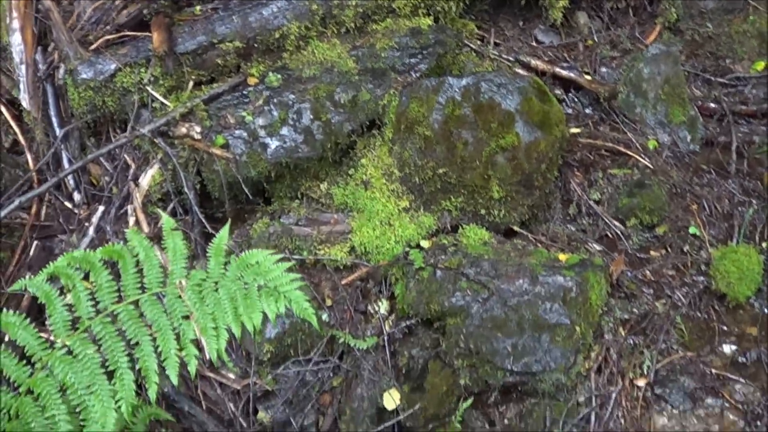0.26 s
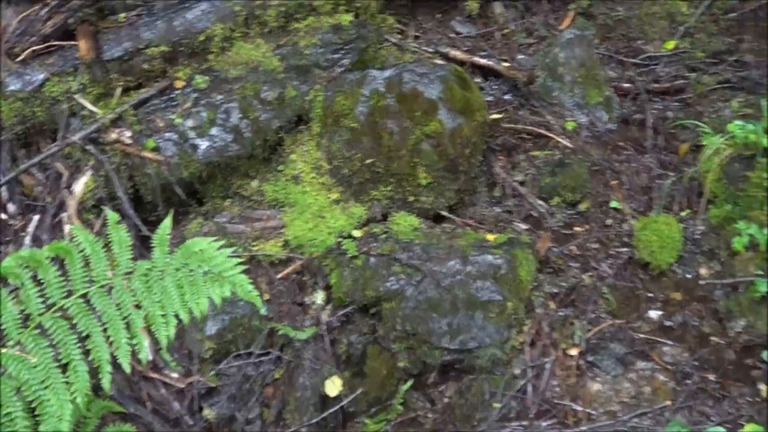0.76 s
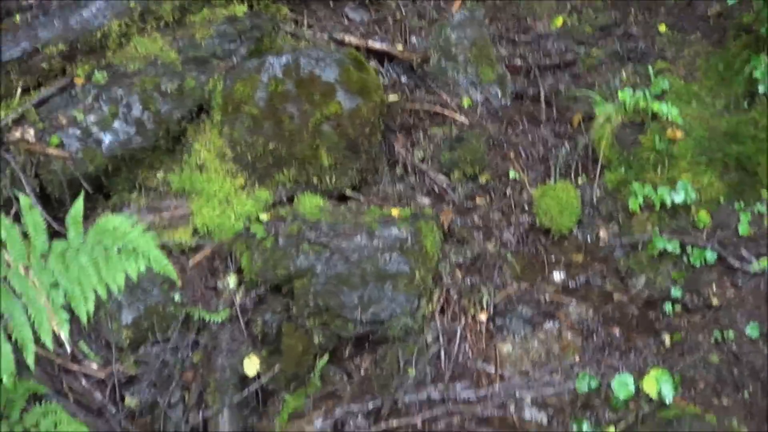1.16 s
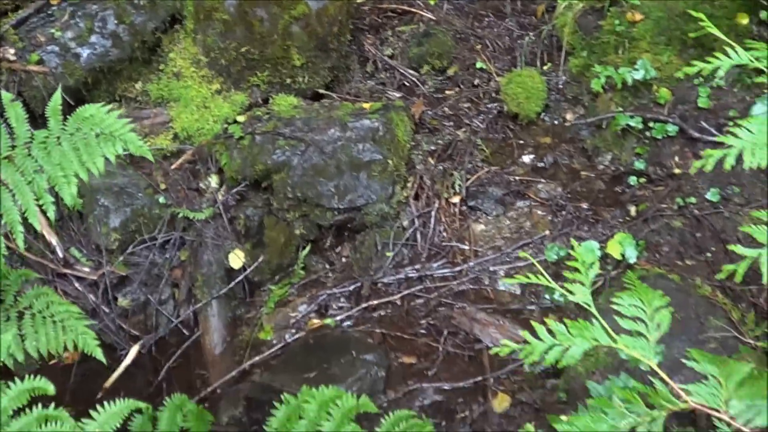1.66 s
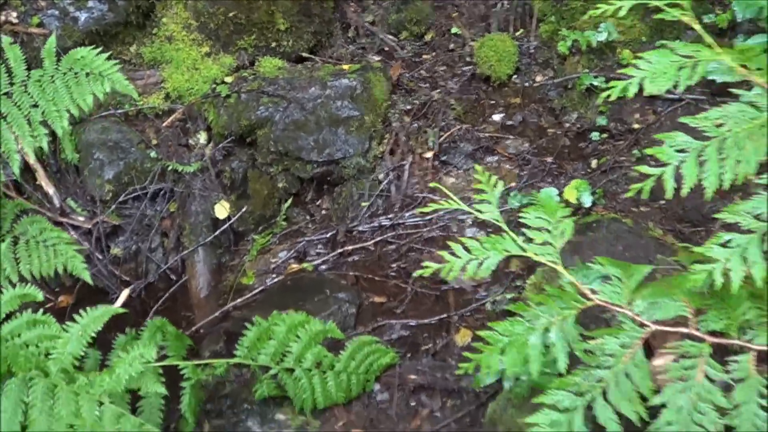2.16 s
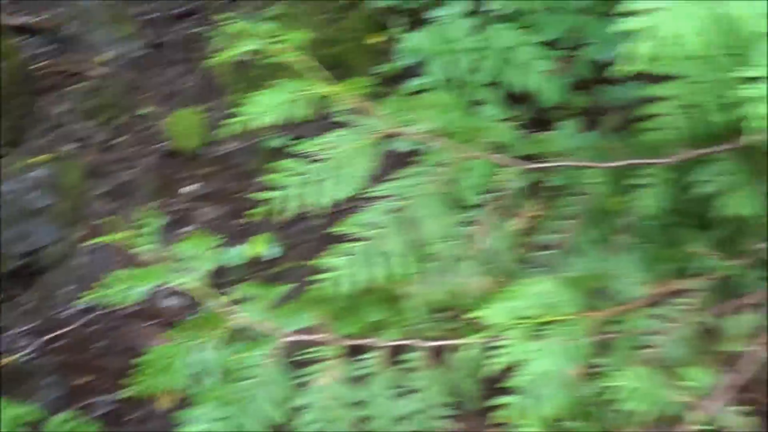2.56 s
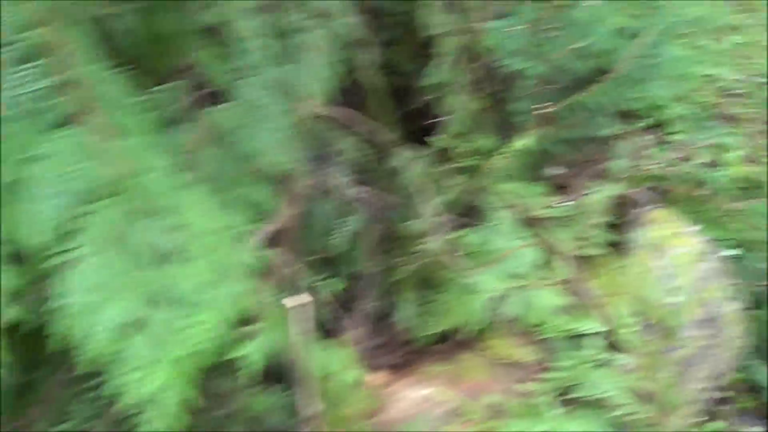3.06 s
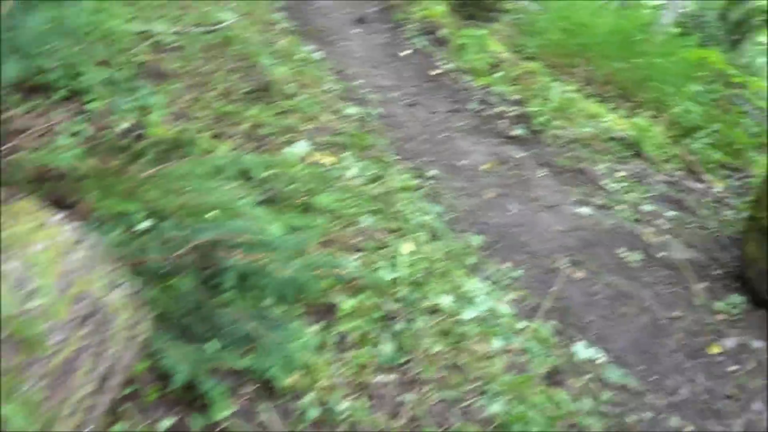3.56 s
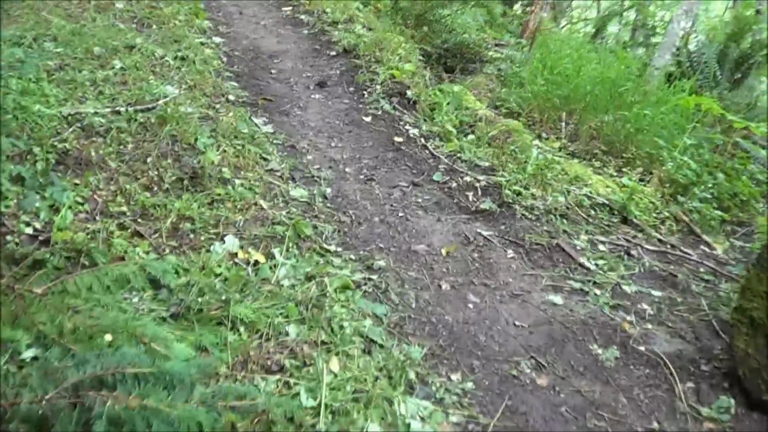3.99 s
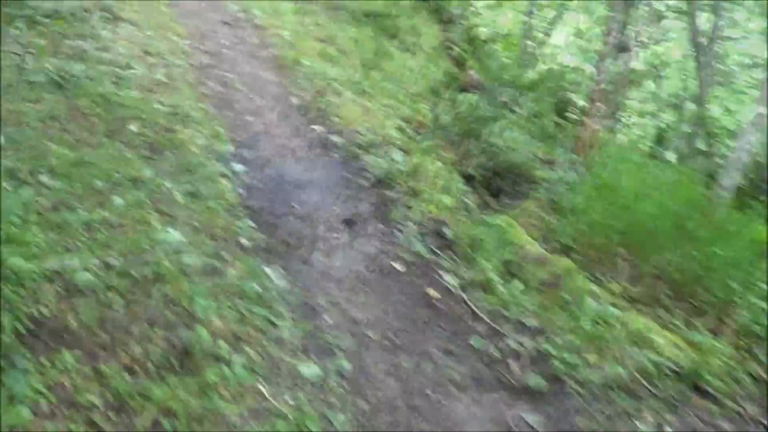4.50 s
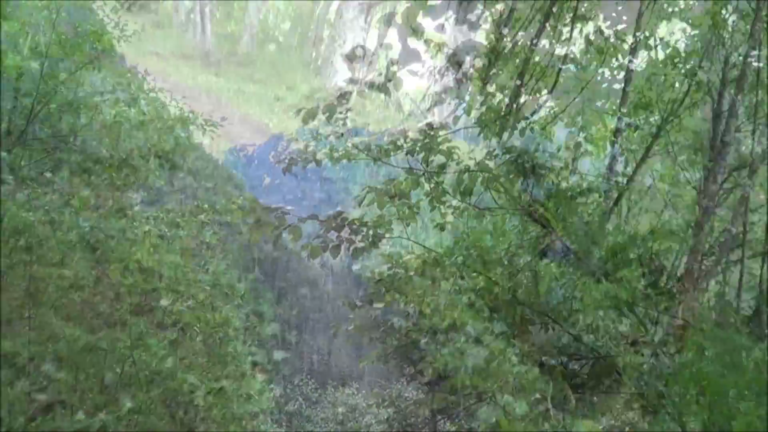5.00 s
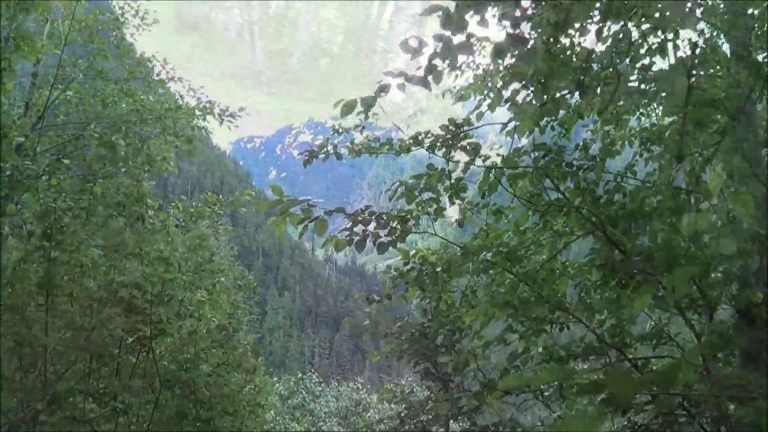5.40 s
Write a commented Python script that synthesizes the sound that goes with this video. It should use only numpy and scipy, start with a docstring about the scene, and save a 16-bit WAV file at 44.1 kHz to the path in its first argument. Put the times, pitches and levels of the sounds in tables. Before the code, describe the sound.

Water falls from a rock overhang in a forest, a steady bright patter with sharp splats and small rising plinks from puddles. Around two and a half seconds the drops are densest. As the camera turns away the patter grows duller and softer, a foot scuffs, hard knocks and a click hit the camera body, and everything fades to a faint rush. Close stereo camera microphone outdoors.

```python
"""Water falling from a rock overhang

Thin streams patter on wet forest stones: showers of filtered noise bursts and ticks in three bands.
Fat drops crack and scatter as noise bursts, as does one scuff of a foot; drops in puddles ring as bubbles
with rising pitch, and a shuffling foot thumps as low rings. The camera turns away, which crossfades the
water's colour; knocks ring its body and its casing clicks.
The patter fades towards the faint rush of the valley, a filtered noise."""
import sys
import numpy as np
from scipy import signal
from scipy.fft import rfft, irfft
from scipy.io import wavfile
from scipy.ndimage import uniform_filter1d

SR = 44100
rng = np.random.default_rng(int(sys.argv[2]) if len(sys.argv) > 2 else 0)


def file_out(sig):
    """Save sig as 16-bit WAV at sys.argv[1]."""
    # one column per channel
    cols = np.atleast_2d(sig).T
    # limit, then scale
    lim = np.clip(cols, -1, 1)
    pcm = np.round(lim * 32767).astype(np.int16)
    wavfile.write(sys.argv[1], SR, pcm)


N = 248720
TIME, HZ = np.arange(N) / SR, np.fft.rfftfreq(N, 1 / SR)

# the falling water as the camera moves, ahead of each layer's trim:
# start_s [s], level_db [dB], treble_tilt_db [dB, treble over middle]
WATER_LEVEL = [(0., -31, 6), (2.5, -28, 5), (3.2, -29.5, 4), (3.9, -30.5, 3), (4.06, -35.5, 3),
               (4.7, -37, 3), (5.09, -45.5, 0), (5.64, -46.5, -4)]
# how far the camera has turned from the water: start_s [s], turned_away_share [0-1]
CAMERA_TURN = [(2.5, 0), (3.3, 0.44), (4.6, 0.66)]


def water():
    """Fine spray, patter on stones and a low trickle share the spectrum; turning away recolours all three."""
    # colour with the camera facing the water: frequency_hz [Hz], density_db [relative dB per Hz]
    facing_colour = [(24, -69), (40, -36.5), (249, -15), (516, -13.5), (790, -8.5), (1410, -9),
                     (1810, -10.5), (2100, -8), (2440, -9), (4680, -7), (5310, -2.5), (6650, 0.5),
                     (9940, 6.5), (14500, -3.5), (16000, -11)]
    # colour with the camera turned away: frequency_hz [Hz], density_db [relative dB per Hz]
    away_colour = [(24, -61), (40, -32), (118, -13), (231, -11), (312, -1.5), (751, -1), (1070, -4.5),
                   (1150, -3), (2380, 5.5), (2980, -2.5), (4030, 6.5), (4680, -5.5), (10400, 5),
                   (14800, -10), (16000, 0.5)]
    trickle_top_hz, patter_top_hz = 1427, 5290
    low, mid = below(trickle_top_hz), below(patter_top_hz)
    spray = shower(per_s=300, spread_db=1.5, scatter_s=0.012, tick_share=0.65, wash_share=0.5)
    patter = shower(per_s=260, spread_db=4.0, scatter_s=0.012, tick_share=0.9, wash_share=0.32)
    trickle = shower(per_s=200, spread_db=0.5, scatter_s=0.012, tick_share=0.48, wash_share=0.9)
    level_db, tilt_db = follow(WATER_LEVEL), follow(WATER_LEVEL, axis=2)
    # as the tilt falls, the spray dulls and the low trickle comes up
    layers = [(spray, 1 - mid, 0.7 + tilt_db),
              (patter, mid - low, 0.7),
              (trickle, low, -0.7 - 1.48 * tilt_db)]
    turned, out = np.clip(follow(CAMERA_TURN), 0, 1), np.zeros((2, N))
    for drops, band_power, trim_db in layers:
        band_gain = np.sqrt(abs(band_power))
        facing = evened(coloured(drops, band_gain * gain_of(read(facing_colour, HZ))))
        away = evened(coloured(drops, band_gain * gain_of(read(away_colour, HZ))))
        out += gain_of(level_db + trim_db) * ((1 - turned) * facing + turned * away)
    return out


def shower(per_s, spread_db, scatter_s, tick_share, wash_share, count=3):
    """Small drops on several stones: decaying droplet bursts, sharp ticks and a steady wash of noise."""
    out, stone_phase = np.zeros((2, N)), np.log2(HZ + 1) * np.pi / 2
    for k in range(count):
        hits = impacts(per_s / count, spread_db)
        # powers add up, so the amplitude of one burst decays with scatter_s
        scatter_power = signal.lfilter([1], [1, -np.exp(-2 / (scatter_s * SR))], hits ** 2)
        bursts = evened(np.sqrt(scatter_power) * rng.standard_normal((2, N)))
        ticks = evened(impacts(per_s * count, spread_db) * rng.choice([-1, 1], (2, N)))
        # each stone favours its own stretches of the spectrum
        stone_gain = np.cos(stone_phase + np.pi * k / count) ** 2
        out += coloured(bursts + tick_share * ticks, stone_gain)
    return evened(out) + wash_share * rng.standard_normal((2, N))


def impacts(per_s, spread_db):
    """Impacts at random times, most of them small and a few large."""
    size = gain_of(spread_db * np.minimum(rng.exponential(1, N), 4))
    return size * (rng.random(N) < per_s / SR)


def splats_and_scuff(size=8192):
    """A crack and a swelling, then dying cloud of noise: a fat drop bursting on stone, or a scuff of a foot."""
    # bursts of noise: fat drops on stone, and at 3.618 s a long scuff of a foot on the ground:
    # start_s [s], level_db [dB], centre_hz [Hz], t60_s [s]
    noise_bursts = [(0.018, -13.5, 9000, 0.12), (0.0664, -15.5, 13500, 0.033), (0.1007, -21, 4200, .03),
                    (0.4487, -18.5, 4400, .12), (0.4852, -17.5, 3000, 0.099), (0.6634, -17, 10800, 0.025),
                    (0.7284, -16, 5800, 0.049), (0.8846, -20, 7400, 0.022), (1.2743, -18, 4620, 0.11),
                    (1.3095, -14.5, 7600, 0.12), (1.5121, -9, 9550, 0.036), (1.8395, -15.5, 7200, 0.15),
                    (1.8612, -15, 10000, .015), (1.8871, -15.5, 6460, 0.21), (2.1816, -15.5, 5830, .06),
                    (2.296, -11, 10200, 0.14), (2.4079, -13, 5200, 0.1), (2.4345, -11, 1600, 0.053),
                    (2.5443, -15.5, 6260, .065), (2.6771, -15.5, 5500, .07), (2.8537, -14.5, 8100, 0.083),
                    (2.9635, -17.5, 2900, 0.085), (2.9858, -12, 8600, 0.061), (3.058, -15, 6250, 0.055),
                    (3.1615, -18.5, 3640, 0.12), (3.312, -15.5, 4000, 0.16), (3.3632, -14, 4940, 0.1),
                    (3.618, -13.5, 6940, 0.3), (4.4635, -23, 10500, 0.0089), (5.1688, -37, 4300, 0.027)]
    # a short burst cracks hard; one that scatters for long starts softly
    soft_t60_s, snap_db, snap_decay_s, slap = 0.076, 7.5, 0.0011, 4.3
    # a long cloud swells slowly and spans a wide band: each a value for a 1 s t60, and a power of t60
    rise_s, rise_power, span_hz, span_power = 0.096, 1.6, 14600, 0.33
    lumps_db = 2
    out, t = np.zeros((2, N)), np.arange(size) / SR
    for s, db, centre_hz, t60 in list(noise_bursts) + strays():
        unevenness = evened(uniform_filter1d(rng.standard_normal(size), size=24))
        lumps = evened(gain_of(lumps_db * unevenness))
        swell = 1 - np.exp(-t / (rise_s * t60 ** rise_power))
        cloud = dying(t, t60) * swell * lumps
        snap = gain_of(snap_db) / (1 + t60 / soft_t60_s)
        envelope = np.hypot(cloud, snap * np.exp(-t / snap_decay_s))
        burst = envelope * rng.choice([-1, 1], (2, size))
        burst[0, 0] += snap * slap  # the first contact is one clean impulse, alike at both ports
        add(out, s, gain_of(db) * struck(burst, centre_hz, span_hz * t60 ** span_power))
    return out


def strays(count=60):
    """Lesser drops, as rows of noise bursts: random times, centres and lengths, their level following the water."""
    per_s, over_water_db, lowest_hz, highest_hz = 7, 0.5, 2460, 12200
    gap, colour, length = rng.random((count, 3)).T
    times = np.cumsum(-np.log(1 - gap)) / per_s
    levels = np.interp(times, TIME, follow(WATER_LEVEL)) + over_water_db
    centres = lowest_hz * (highest_hz / lowest_hz) ** colour
    t60s = 0.012 * (.5 + length)  # 6 to 18 ms
    return [row for row in zip(times, levels, centres, t60s) if row[0] < TIME[-1]]


def struck(burst, centre_hz, span_hz):
    """Colours an impact with one broad hump; minimum phase, so nothing sounds before it."""
    widest_octaves, lowest_hz, top_hz = 2.2, 344, 14300
    hz = np.fft.rfftfreq(burst.shape[-1], 1 / SR)
    octaves = min(span_hz / centre_hz, widest_octaves)
    hump = 1 / (1 + (np.log2((hz + 1) / centre_hz) / octaves) ** 2)
    bass_cut = hz ** 2 / (hz ** 2 + lowest_hz ** 2)
    treble_cut = 1 + (hz / top_hz) ** 8
    colour = evened(hump * bass_cut / treble_cut + 1e-5)
    # the Hilbert transform of the log gain yields the minimum phase
    log_gain = np.log(np.r_[colour, colour[-2:0:-1]])
    causal = np.exp(np.conj(signal.hilbert(log_gain)))[:len(hz)]
    return irfft(rfft(burst) * causal)


def droplets(level_db=-8.5, lowest_hz=1700, highest_hz=4800, per_s=230, spread_db=2.5, cycles=11.0,
             count=24, size=900):
    """Tiny bubbles tinkle within the patter as rising, decaying sines, each pitch in its own place."""
    out, t = np.zeros((2, N)), np.arange(size) / SR
    for hz in np.geomspace(lowest_hz, highest_hz, count):
        chirp = np.exp(-hz * t / cycles) * np.sin(2 * np.pi * hz * t * (1 + 10 * t))
        ring = high_passed(chirp, hz / 2)
        place = np.array([[1], [rng.standard_normal()]])
        out += place * signal.oaconvolve(impacts(per_s / count, spread_db), ring)[:N]
    return gain_of(follow(WATER_LEVEL) + level_db) * evened(out)


def bubbles_and_thumps(ring_s=0.028, rise=0.035, fizz_share=0.2, fizz_t60=0.16, echo_s=(.0042, .012),
                       echo_gain=(.4, .25), left_db=5.0, size=5000):
    """A rising ring, a fizz of noise and two echoes off the rocks: a puddle drop's bubble, or a foot's low thump."""
    # drops into puddles, and, at 320 to 412 Hz, low thumps of a shuffling foot:
    # start_s [s], level_db [dB, ahead of the left-right balance], pitch_hz [Hz, as the ring starts]
    rings = [(0.1487, -17, 2130), (0.433, -20, 2270), (0.964, -14.5, 2280), (1.001, -16.5, 3960),
             (1.111, -11.5, 2570), (1.3067, -16, 2590), (1.446, -12.5, 2570), (1.481, -14.5, 3630),
             (1.585, -24, 2180), (1.9585, -14.5, 2620), (2.1148, -21, 2080), (2.285, -14, 2060),
             (2.4356, -7, 2070), (2.4654, -11, 2750), (2.533, -10.5, 2050), (2.5467, -13, 2240),
             (2.679, -13, 3030), (3.217, -24, 412), (3.22, -17, 2060), (3.5297, -14, 2570),
             (3.595, -23, 358), (3.617, -24, 325), (3.7623, -16.5, 2500), (3.8056, -13, 3900),
             (4.0105, -20, 4000), (4.394, -31, 320), (4.5718, -23.5, 2870), (4.954, -29, 810),
             (5.137, -30, 1900)]
    out, t = np.zeros((2, N)), np.arange(size) / SR
    for s, db, hz in rings:
        age = t / (ring_s * np.sqrt(1000 / hz))  # low pitches ring longer; down 60 dB at age 1
        chirp = np.sin(2 * np.pi * hz * t * (1 + rise * age))
        ring = high_passed(gain_of(db - 60 * age) * chirp, hz / 2)
        band = signal.butter(2, [.75 * hz, 1.35 * hz], "bandpass", fs=SR, output="sos")
        # part of the fizz is common to both ports
        noise = rng.standard_normal(size) + .5 * rng.standard_normal((2, size))
        fizz = evened(signal.sosfilt(band, noise))
        add(out, s, ring + fizz_share * gain_of(db) * dying(t, fizz_t60) * fizz)
        for delay, gain in zip(echo_s, echo_gain):
            for channel in out:
                add(channel, s + delay * rng.uniform(.85, 1.15), gain * ring)
    # all of these lie to the left: the right port hears them softer and two samples later
    left = out[0] * gain_of(left_db / 2)
    right = np.roll(out[1], 2) * gain_of(-left_db / 2)
    return np.array([left, right])


def knocks(lowest_hz=380, lag_s=0.00013, size=4000):
    """Each knock rings the modes of the camera body and reaches the left port first."""
    # knocks on the camera: start_s [s], level_db [dB]
    hits = [(3.9811, -13), (3.9820, -10), (3.9859, -10.5), (3.9902, -25), (4.5409, -17.5), (4.545, -27)]
    # modes of the camera body: pitch_hz [Hz], level_db [dB], t60_s [s]
    body_modes = [(471, -18, 0.089), (745, -17, 0.032), (962, 0, 0.03), (1135, 0, 0.012),
                  (1750, -0.5, 0.0062), (2370, -13, 0.025)]
    out, t = np.zeros((2, N)), np.arange(size) / SR
    ring = sum(gain_of(db - 60 * t / t60) * np.sin(2 * np.pi * hz * t) for hz, db, t60 in body_modes)
    for s, db in hits:
        add(out[0], s, gain_of(db) * ring)
        add(out[1], s + lag_s, gain_of(db) * ring)
    return high_passed(high_passed(out, lowest_hz), lowest_hz)  # the small body radiates no bass


def clicks(size=4096):
    """The casing gives under the grip: a very short rasp with a faint tail."""
    # dry clicks of the casing: start_s [s], level_db [dB], centre_hz [Hz]
    casing_clicks = [(4.0236, -6.5, 1690), (4.7333, -18, 1990), (4.802, -13, 3580), (4.891, -18.5, 13500),
                     (4.9934, -18, 9850), (5.032, -21, 11000), (5.3708, -25.5, 2500)]
    t60_s, tail_db, tail_t60_s, span_hz = 0.0079, -17.5, 0.13, 6500
    out, t = np.zeros((2, N)), np.arange(size) / SR
    shape = dying(t, t60_s) + gain_of(tail_db) * dying(t, tail_t60_s)
    for s, db, centre_hz in casing_clicks:
        rasp = shape * rng.choice([-1, 1], (2, size))
        add(out, s, gain_of(db) * struck(rasp, centre_hz, span_hz))
    return out


def valley():
    """A smooth, distant rush: steady noise with a fixed colour and a slowly moving level."""
    # colour of the rush: frequency_hz [Hz], density_db [relative dB per Hz]
    rush_colour = [(24, -70), (40, -44), (228, -7), (339, -7), (465, -0.5), (637, 3), (769, -23),
                   (6000, -7), (7800, -72), (13200, -120)]
    # loudness of the rush: start_s [s], level_db [dB]
    rush_level = [(4.2, -45), (5.2, -61.5), (5.6, -50)]
    rush = evened(coloured(rng.standard_normal((2, N)), gain_of(read(rush_colour, HZ))))
    return gain_of(follow(rush_level)) * rush


def ports(pair):
    """Two sound fields become the partly alike signals of two close microphone ports.
    Once the water is off to the side, the ports agree less in the treble."""
    # level between the ports: frequency_hz [Hz], left_over_right_db [dB]
    level_lean = [(60, -1), (110, 0.5), (200, 0.5), (380, 0), (700, 0.5), (1290, 3), (2380, 2.5),
                  (4400, 4.5), (8120, -0.1), (15000, -0.5)]
    # phase between the ports: frequency_hz [Hz], left_lead_rad [radians]
    phase_lead = [(100, 0.), (200, .1), (600, .75), (1100, .8), (1500, .35), (2300, .55), (4200, .65),
                  (5200, .05), (15000, 0.)]
    # the part that the ports do not share: frequency_hz [Hz], facing_db [dB], turned_away_db [dB]
    unshared = [(30, -8, -7), (90, -19, -17), (300, -14, -13), (640, -9, -7), (1400, -9, -7),
                (3100, -7.5, -3), (5500, -10.5, -3), (9000, -16.5, -6.5), (15000, -18, -15)]
    a, b = rfft(pair)
    turned, out = np.clip(follow(CAMERA_TURN), 0, 1), np.zeros((2, N))
    # each port takes half of the level and phase difference
    lean = gain_of(read(level_lean, HZ) / 2) * np.exp(1j * read(phase_lead, HZ) / 2)
    for k, share in enumerate([1 - turned, turned]):
        apart = gain_of(read(np.array(unshared)[:, [0, k + 1]], HZ))
        left, right = (a + apart * b) * lean, (a - apart * b) / lean
        out += share * irfft(np.array([left, right]) / np.hypot(1, apart), N)
    return out


def gain_of(db):
    """Decibels to amplitude."""
    return 10 ** (np.asarray(db) / 20)


def evened(x):
    """Scales to rms 1."""
    return x / np.sqrt(np.mean(x ** 2) + 1e-20)


def dying(t, t60):
    """An envelope that falls 60 dB in t60 seconds."""
    return gain_of(-60 * t / t60)


def read(points, hz):
    """Reads a spectrum table on a log-frequency axis."""
    f, value = np.transpose(points)
    return np.interp(np.log(hz + 1), np.log(f + 1), value)


def follow(rows, axis=1):
    """One column of a curve over time, sample by sample."""
    rows = np.asarray(rows)
    return np.interp(TIME, rows[:, 0], rows[:, axis])


def add(mix, s, sound):
    """Mixes a sound in at time s."""
    part = mix[..., max(round(s * SR), 0):][..., :sound.shape[-1]]
    part += sound[..., :part.shape[-1]]


def coloured(x, gain):
    """Filters by a gain for each frequency."""
    return irfft(rfft(x) * gain, N)


def below(hz, order=8):
    """Share of the power that a steep low-pass lets through."""
    return 1 / (1 + (HZ / hz) ** order)


def high_passed(x, hz):
    """Takes away the bass that a small source cannot radiate."""
    return signal.sosfilt(signal.butter(2, hz, "highpass", fs=SR, output="sos"), x)


def scene():
    """Most layers reach both ports through one stereo stage; rings and knocks have their own stereo."""
    around = water() + droplets() + valley() + clicks() + splats_and_scuff()
    return bubbles_and_thumps() + knocks() + ports(around)


def record(dry):
    """Rounds off the sharpest peaks near full scale, then cuts the top treble steeply."""
    edge_hz = 15900
    rounded = dry / (1 + abs(dry / .9) ** 6) ** (1 / 6)
    low_pass = signal.firwin(511, edge_hz, window=("kaiser", 9), fs=SR)
    return signal.oaconvolve(rounded, low_pass[None], "same")


dry = scene()
out = record(dry)
file_out(out)
```